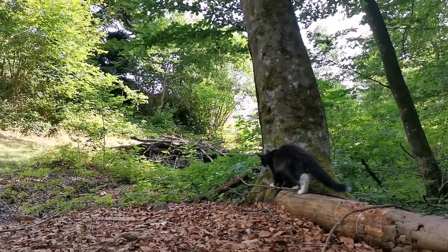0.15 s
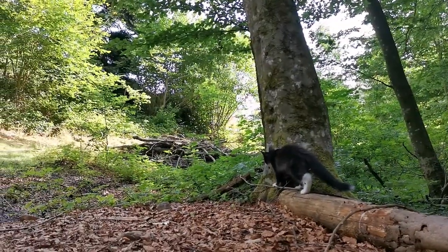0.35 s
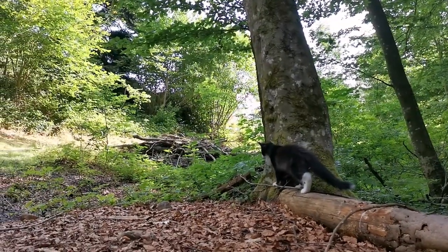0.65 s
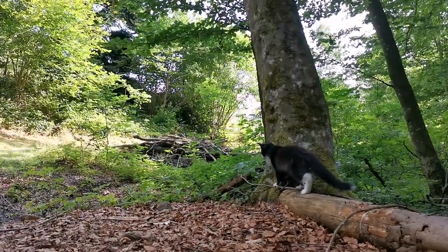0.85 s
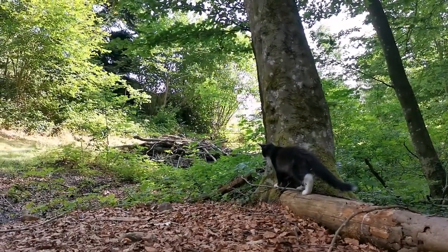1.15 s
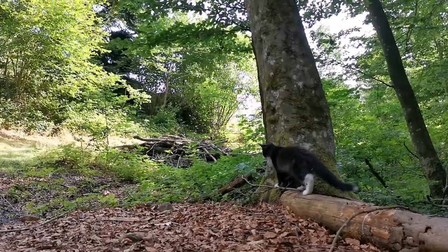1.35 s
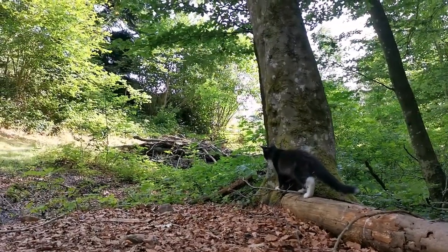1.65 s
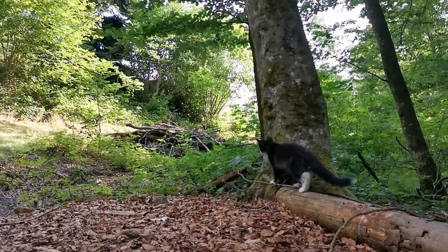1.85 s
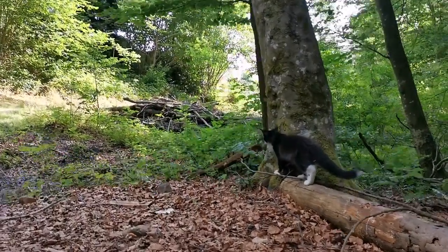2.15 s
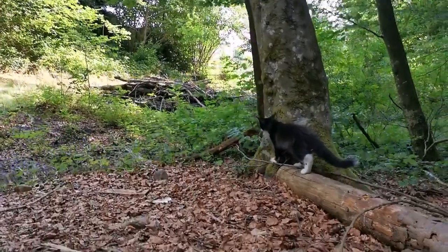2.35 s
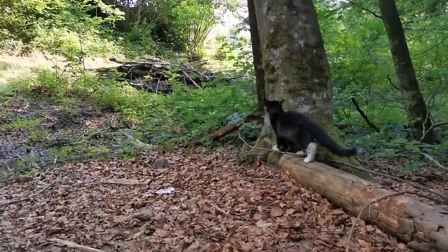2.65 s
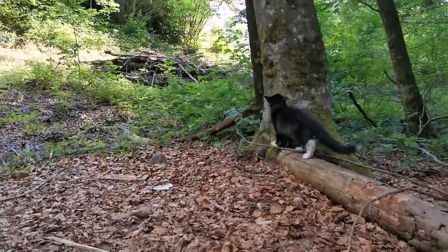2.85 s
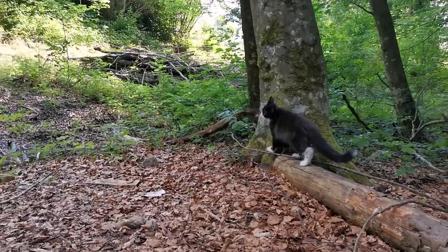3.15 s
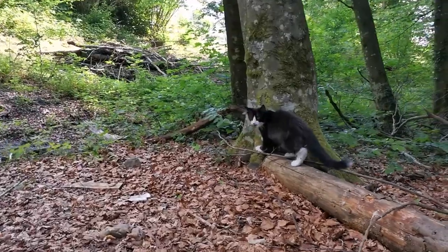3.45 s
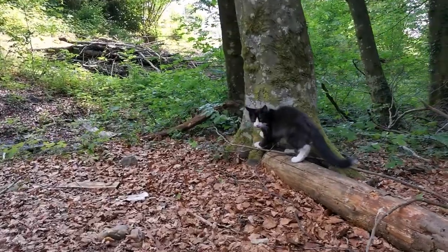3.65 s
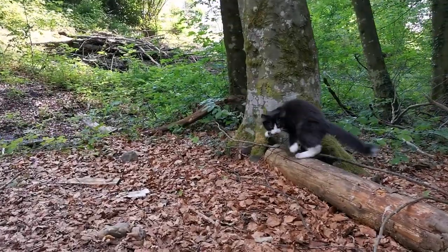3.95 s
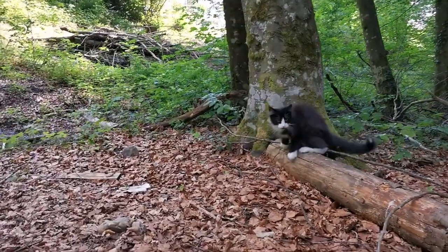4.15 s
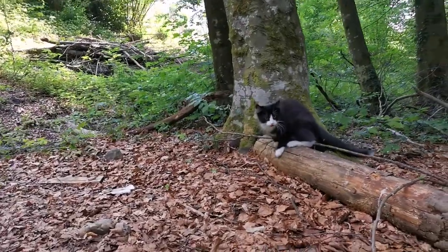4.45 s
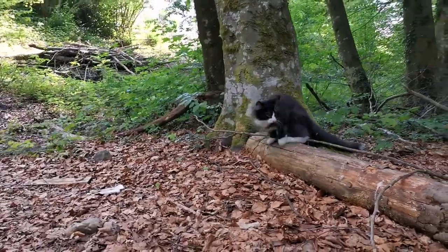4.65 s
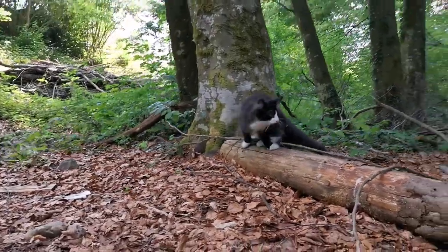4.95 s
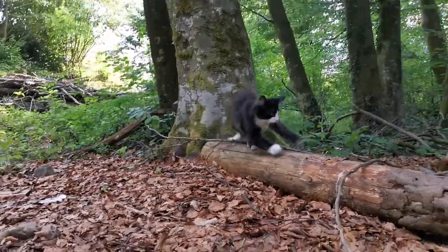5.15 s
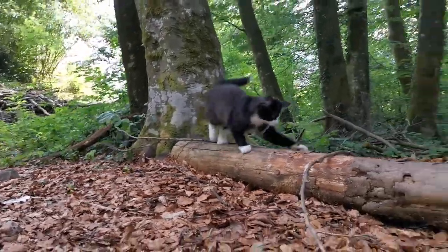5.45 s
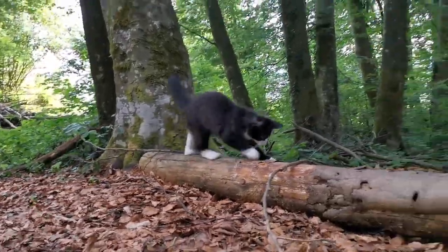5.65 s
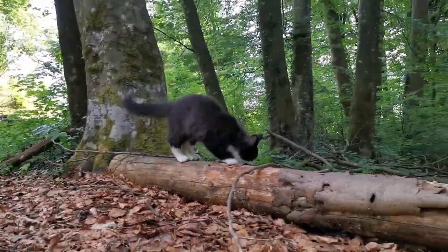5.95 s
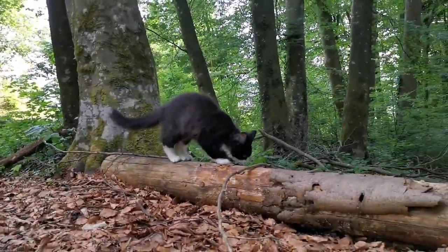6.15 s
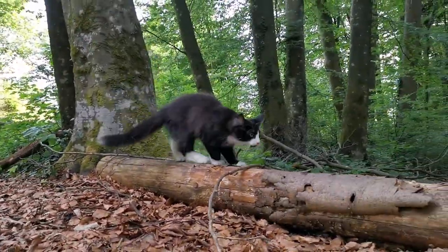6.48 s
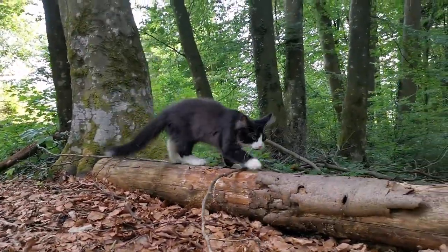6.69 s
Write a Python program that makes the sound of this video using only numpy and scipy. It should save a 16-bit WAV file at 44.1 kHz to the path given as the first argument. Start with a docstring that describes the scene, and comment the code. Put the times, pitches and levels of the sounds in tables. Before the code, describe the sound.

In a wood, near and distant birds sing over softly hissing foliage. A few dull knocks and a low rumble come from handling the microphone. Someone then walks slowly over dry leaf litter, crackling leaves and crunching damp sticks, as a bird trills among the trees. The steps end with a run of close, sharp twig cracks, leaving high bird calls and two faint snaps.

```python
"""A summer wood. Over a faint hush of trees and a low rumble of air and handling, a warbler whistles,
joined by tits and far birds; the notes echo off the trunks. From 0.6 s fingers bump the microphone's
case, which rings and thuds. From about 2 s its holder steps through dry leaves, snapping twigs and
crunching damp sticks, while a finch trills and ends in a buzz. The last step falls at 5.5 s;
thin high calls and two faint snaps close the scene."""
import sys
import numpy as np
from scipy import signal
from scipy.fft import rfft, irfft, next_fast_len
from scipy.io import wavfile
from scipy.ndimage import map_coordinates

SR = 44100
rng = np.random.default_rng(int(sys.argv[2]) if len(sys.argv) > 2 else 0)


def wrap_up_sound(samples):
    """Save the sound to the file named by the first command line argument, as 16-bit audio."""
    columns = np.atleast_2d(samples).T
    # keep every value between -1 and 1, then stretch to whole-number steps
    tamed = np.clip(columns, -1, 1)
    steps = np.round(tamed * 32767).astype(np.int16)
    wavfile.write(sys.argv[1], SR, steps)


N = 300762

# Spectra. Each row: frequency in Hz, relative density in dB.
FOLIAGE_SPECTRUM = [(150, -4), (400, -3.5), (1500, -8), (3800, -10.5), (6800, -15), (8600, -33),
                    (15000, -45)]
RUMBLE_SPECTRUM = [(12, -12), (35, 1), (100, -1.5), (260, -18.5), (2000, -59)]
TWIG_SPECTRUM = [(100, 0), (500, -4), (1600, -2.5), (4300, -0.5), (7300, -0.5), (8600, -20), (15000, -40)]
CRUSH_SPECTRUM = [(150, -16.5), (400, -1.5), (900, 0.5), (1600, 3.5), (2600, -4), (9000, -40)]
CRACKLE_SPECTRUM = [(300, -37.5), (1500, -13.5), (2800, -1.5), (4300, 4), (7400, 1), (8500, -12.5),
                    (12000, -32), (15000, -28.5)]
DAMP_WOOD_SPECTRUM = [(200, -26), (450, 4), (1100, 9), (2000, -17.5), (6000, -30)]
# Shifts of the holding hand. Each row: peak time in seconds, level in dB.
HAND_SHIFTS = [(1.98, -48), (2.42, -52), (2.959, -52), (4.12, -48), (4.31, -47.5)]
# Bird notes. Each row: start and length in seconds, start and end pitch in Hz, relative level in dB.
WARBLER_SLURS = [(.165, 0.052, 3750, 3180, -47), (.359, 0.034, 3310, 3000, -47),
                 (.392, 0.038, 3010, 2720, -49), (.722, 0.076, 3750, 3120, -48.5),
                 (.925, 0.037, 4230, 3730, -47.5), (1.312, 0.039, 3520, 2990, -50.5),
                 (1.39, .075, 3820, 3584, -46), (1.525, 0.049, 2780, 2570, -49),
                 (1.876, 0.041, 3650, 3380, -51), (2.14, 0.058, 4000, 3610, -48)]
TIT_CALLS = [(.57, 0.042, 4900, 5730, -60.5), (1.06, 0.067, 5660, 6520, -43),
             (2.005, 0.064, 7780, 6520, -41.5), (4.36, 0.09, 7410, 6750, -43.5),
             (6.06, 0.11, 6100, 7400, -53.5)]
THIN_NOTES = [(0.72, 0.12, 7300, 7030, -53.5), (0.884, 0.11, 7380, 7120, -54.5),
              (1.095, 0.077, 7510, 7100, -57), (1.299, 0.11, 7100, 6350, -59.5),
              (3.796, 0.15, 7380, 6800, -54), (4.798, 0.3, 5400, 5300, -52),
              (6.44, 0.16, 5360, 5150, -60.5)]
FAR_BIRD_NOTES = [(1.1, .36, 2115, 2008, -66), (2.92, 0.165, 1953, 2010, -54.5)]
FINCH_SCOOPS = [(3.679, 0.07, 2650, 1992, -50), (3.79, .08, 3100, 3370, -38.5)]
FINCH_FLOURISH = [(3.91, 0.022, 4840, 4920, -44.5), (3.935, 0.1, 4410, 3400, -49.5),
                  (4.105, .12, 4690, 5650, -51), (4.372, 0.081, 3804, 4254, -51)]
# Rising whistles: the warbler's, and last a far bird's late note. Each row: start and length in seconds, end
# pitch in Hz, relative level in dB.
RISING_WHISTLES = [(0.0, 0.046, 4050, -48), (0.082, 0.073, 3543, -45), (0.266, 0.044, 2350, -57.5),
                   (0.482, 0.049, 3700, -46.5), (0.85, 0.069, 3300, -53), (1.729, 0.1, 3090, -48),
                   (1.76, 0.12, 2435, -59), (2.066, 0.055, 4070, -50.5), (6.41, 0.096, 3580, -62)]
# Contact calls. Each row: start in seconds, relative level in dB.
CONTACT_CHIPS = [(0.0, -48), (0.065, -40), (0.171, -40.5), (2.626, -39.5), (2.77, -38.5), (2.921, -46),
                 (3.011, -44.5), (3.092, -45)]
# Finger bumps. Each row: start in seconds, level in dB, pitch in Hz, relative thud level in dB.
CASE_KNOCKS = [(0.63, -36, 396, -2), (1.2858, -13, 430, -8.5), (1.640, -32.5, 377, -3),
               (1.739, -36.5, 560, 4.5), (1.866, -32.5, 412, -27), (2.112, -31.5, 530, -16),
               (2.216, -15.5, 561, -5), (5.261, -39, 313, -6)]
# Case resonances. Each row: multiple of the pitch, relative level in dB.
CASE_MODES = [(0.7, -2), (1, 3.5), (1.55, -1), (2.4, -3.5), (3.7, -4.5)]
# Twig breaks. Each row: start in seconds, level in dB, high-pass corner in Hz.
TWIG_SNAPS = [(1.93, -22, 5400), (2.309, -15.5, 4830), (3.354, -11, 4100), (4.167, -21, 5000),
              (4.766, -9.5, 2520), (4.9344, -13.5, 690), (4.988, -22.5, 800), (5.376, -21.5, 2500),
              (5.027, -19, 2720), (5.079, -12.5, 485), (5.1017, -14, 615), (5.107, 1.5, 420),
              (5.129, -21.5, 1590), (5.215, -23.5, 1020), (5.404, -19.5, 2500), (5.447, -10, 2170),
              (5.544, -11.5, 1200), (6.299, -26.5, 1500), (6.414, -25.5, 980)]
# Trill syllables. Each row: delay and length in seconds, start and end pitch in Hz, relative level in dB.
HIGH_STROKES = [(0, 0.027, 6700, 5090, 1.5), (0.035, 0.0316, 5010, 4435, 0.5),
                (0.069, 0.035, 4200, 3800, -4)]
LOW_STROKES = [(.004, .04, 4400, 3605, 0), (.026, .035, 3700, 2648, -3), (.07, .05, 3450, 2950, -3)]
# Foot presses. Each row: time of full weight in seconds, rise in seconds per 20 dB, hold in seconds,
# crush level in dB, crackle level in dB.
FOOTSTEPS = [(2.519, 0.43, 0.034, -61.5, -45.5), (3.121, 0.01, 0.07, -50.5, -44.5),
             (3.27, 0.24, 0.21, -50, -43.5), (3.55, 1, 0.056, -59.5, -40.5), (4.41, 0.6, 0.075, -57, -51),
             (4.772, 0.28, 0.15, -51, -44.5), (5.483, 0.43, 0.076, -54, -43)]
# Damp sticks. Each row: start in seconds, level in dB.
STICK_CRUNCHES = [(3.174, -38), (3.352, -26), (3.439, -29.5), (3.985, -39), (4.137, -43)]
# Microphone ports. Each row: frequency in Hz, left minus right in dB, lag of the right in radians.
PORT_RESPONSE = [(89, -8, 0), (497, -3.5, 0), (1530, 1, 0), (3120, 6, 1.5), (4500, -1, 3), (5220, 3, 4),
                 (6570, 12, 6), (8000, 16, 7), (11000, -1, 7.5)]

NEAR_CORRELATION, FAR_CORRELATION = 0.76, 0.51


def from_db(db):
    """Decibels to gain."""
    return 10 ** (np.asarray(db) / 20)


def unit_rms(x):
    """Scale to unit power."""
    return x / np.sqrt(np.mean(x ** 2) + 1e-20)


def add(out, start_s, sound):
    """Mix a sound in at a time."""
    i = max(0, int(start_s * SR))
    out[..., i:i + sound.shape[-1]] += sound[..., :N - i]


def drift(rate_hz, size):
    """Random wander, spread about 1."""
    at = np.arange(size) * rate_hz / SR
    return map_coordinates(rng.standard_normal(size // 20 + 2), [at], order=1, mode="wrap")


def colour(x, spectrum):
    """Minimum-phase filter of a given spectrum, unit power gain."""
    size = next_fast_len(N + SR // 2, True)
    hz, db = np.transpose(spectrum)
    log_hz = np.log(np.arange(size // 2 + 1) * SR / size + 1)
    gain = unit_rms(from_db(np.interp(log_hz, np.log(hz), db)))
    cepstrum = irfft(np.log(gain), size)[:size // 2]
    cepstrum[1:] *= 2
    return irfft(rfft(x, size) * np.exp(rfft(cepstrum, size)), size)[..., :N]


def stereo(pair, correlation):
    """Two independent signals to correlated left and right."""
    mid = np.sqrt(1 + correlation) * pair[0]
    side = np.sqrt(1 - correlation) * pair[1]
    return np.array([mid + side, mid - side]) / np.sqrt(2)


def noise(size, correlation):
    """Stereo white noise."""
    return stereo(rng.standard_normal((2, size)), correlation)


def foliage(level_db=-63.5):
    """Far leaves hiss evenly."""
    return from_db(level_db) * colour(noise(N, FAR_CORRELATION), FOLIAGE_SPECTRUM)


def rumble(air_db=-59.5, shift_half_width_s=0.052):
    """Air rumbles in lumps, more when the hand shifts."""
    t = np.arange(N) / SR
    hand = sum(from_db(db) / (1 + ((t - peak_s) / shift_half_width_s) ** 2) for peak_s, db in HAND_SHIFTS)
    air = from_db(air_db + 2.6 * drift(rate_hz=14, size=N))
    return colour(noise(N, FAR_CORRELATION) * np.hypot(air, hand), RUMBLE_SPECTRUM)


def forest(x, far_t60_s, near_t60_s, far_db, onset_s=0.0013):
    """Near trunks and leaves scatter quick echoes, far ones a tail."""
    t = np.arange(SR) / SR
    near = noise(SR, FAR_CORRELATION) * from_db(-60 * t / near_t60_s)
    far = noise(SR, FAR_CORRELATION) * from_db(far_db - 60 * t / far_t60_s)
    echoes = unit_rms((near + far) * (1 - np.exp(-t / onset_s))) / np.sqrt(SR)
    return signal.fftconvolve(np.atleast_2d(x), echoes, axes=1)[:, :N]


def bird(notes, bend, waver, direct_db, echo_db, t60_s=1.14, arch=0, buzz=0, buzz_hz=155):
    """Gliding sine notes, direct and via the trees; more bend nears the end pitch sooner."""
    song = np.zeros(N)
    for start_s, length_s, start_hz, end_hz, db in notes:
        progress = np.linspace(0, 1, int(length_s * SR))
        hump = np.abs(np.sin(np.pi * progress))
        glide_hz = (end_hz + (start_hz - end_hz) * (1 - progress) ** bend) * (1 + arch * hump)
        wobble = waver * drift(rate_hz=402.5, size=len(progress))
        rasp = buzz * np.sin(2 * np.pi * buzz_hz * length_s * progress)
        phase_rad = 2 * np.pi * np.cumsum(glide_hz * (1 + wobble + rasp)) / SR
        swell = np.sqrt(hump) * np.tanh(20 * progress * (1 - progress))
        add(song, start_s, from_db(db) * swell * np.sin(phase_rad))
    echo = forest(song, far_t60_s=t60_s, near_t60_s=0.48, far_db=-5.5)
    return from_db(direct_db) * song + from_db(echo_db) * echo


def warbler(start_ratio=0.94):
    """Mellow falling slurs and slightly rising whistles, with one late far-bird note."""
    whistles = [(start_s, length_s, hz * start_ratio, hz, db)
                for start_s, length_s, hz, db in RISING_WHISTLES]
    return bird(WARBLER_SLURS + whistles, bend=2.41, waver=0.004, direct_db=-2.5, echo_db=-1.7, t60_s=1.2)


def contact_calls(length_s=0.0085, start_hz=5010, end_hz=7344):
    """Sharp upward chips."""
    notes = [(start_s, length_s, start_hz, end_hz, db) for start_s, db in CONTACT_CHIPS]
    return bird(notes, bend=2.12, waver=0.0045, direct_db=3.5, echo_db=5.5, t60_s=0.26)


def chorus(from_s, to_s, low_hz, high_hz, level_db, count, length_s=0.09, slide=0.06):
    """Far birds: short notes at random times and pitches, nearly all echo."""
    notes = []
    for k, (when, pitch, turn) in enumerate(rng.random((count, 3))):
        start_s = from_s + (to_s - from_s) * (k + when) / count
        hz = low_hz * (high_hz / low_hz) ** pitch
        notes.append((start_s, length_s, hz, hz * (1 + slide * (2 * turn - 1)), level_db))
    return bird(notes, bend=0.98, waver=0.0219, direct_db=-20, echo_db=3)


def tits():
    """High calls, raspy from fast pitch modulation."""
    return bird(TIT_CALLS, bend=2.366, waver=0.0266, buzz=0.048, direct_db=-6.5, echo_db=6, t60_s=0.66)


def case_knocks(contact_s=0.00099, case_t60_s=0.013, dulling=0.26,
                rock_s=0.004, thud_t60_s=0.079, thud_hz=52.6, thud_hz_per_db=1.9):
    """A fingertip rings and rocks the damped case; heavier means a brighter ring and a deeper thud."""
    out, t = np.zeros(N), np.arange(SR // 5) / SR
    for start_s, db, hz, thud_db in CASE_KNOCKS:
        ring = sum(from_db(mode_db + dulling * db * max(ratio - 1, 0) - 60 * t / case_t60_s)
                   * np.sin(2 * np.pi * hz * ratio * t) for ratio, mode_db in CASE_MODES)
        ring *= 1 - np.exp(-t / contact_s)
        thud = np.sin(2 * np.pi * (thud_hz - thud_hz_per_db * db) * t)
        thud *= from_db(thud_db - 60 * t / thud_t60_s) * (1 - np.exp(-t / rock_s))
        add(out, start_s, from_db(db) * (ring + thud))
    return out


def thin_whistles(upper_ratio=1.16, upper_db=-18):
    """High arched bird notes with a faint second voice."""
    upper = [(start_s, length_s, start_hz * upper_ratio, end_hz * upper_ratio, db + upper_db)
             for start_s, length_s, start_hz, end_hz, db in THIN_NOTES]
    return bird(THIN_NOTES + upper, bend=0.93, arch=0.045, waver=0.007, direct_db=-4.5, echo_db=-5)


def far_bird():
    """Low wavering notes, mostly echo."""
    return bird(FAR_BIRD_NOTES, bend=1.17, waver=0.013, direct_db=-11, echo_db=2.5, t60_s=1.6)


def twig_snaps(decay_s=0.00088, splinter_db=-13, fullband_db=-22):
    """One sharp crack, then brief splintering; thin twigs lack the lows."""
    out, t = np.zeros((2, N)), np.arange(SR // 50) / SR
    for start_s, db, corner_hz in TWIG_SNAPS:
        crack = from_db(splinter_db) * noise(len(t), NEAR_CORRELATION) * np.exp(-t / decay_s)
        crack[:, 0] += 1
        highs = signal.sosfilt(signal.butter(2, corner_hz, "high", fs=SR, output="sos"), crack)
        add(out, start_s, from_db(db) * (highs + from_db(fullband_db) * crack))
    return colour(out, TWIG_SPECTRUM)


def finch(start_s=2.297, beat_s=0.1497, count=9, high_count=4, pitch_spread=0.022,
          full_db=-39.5, soft_db=-11.5, swell_s=0.18):
    """An even, swelling trill, high syllables then low; two scoops; a buzzing flourish."""
    notes = []
    for k, pitch in enumerate(1 + pitch_spread * rng.standard_normal(count)):
        since_s = k * beat_s
        level_db = full_db + soft_db * np.exp(-since_s / swell_s)
        for delay_s, length_s, start_hz, end_hz, db in HIGH_STROKES if k < high_count else LOW_STROKES:
            onset_s = start_s + since_s + delay_s
            notes.append((onset_s, length_s, start_hz * pitch, end_hz * pitch, level_db + db))
    trill = bird(notes + FINCH_SCOOPS, bend=1.6, waver=0.0419, direct_db=-5.5, echo_db=4, t60_s=1.4)
    flourish = bird(FINCH_FLOURISH, bend=2, waver=0.035, buzz=0.072, direct_db=6.5, echo_db=10.5)
    return trill + flourish


def foot_pressure(release_db_per_s=223, settle_db=-18, settle_db_per_s=5):
    """Crush and crackle gains: the foot presses, holds and lifts; the leaves slowly spring back."""
    t = np.arange(N) / SR
    full_s, rise_s, hold_s, crush_db, crackle_db = np.transpose(FOOTSTEPS)[:, :, None]
    before_s, after_s = np.maximum(full_s - t, 0), np.maximum(t - full_s - hold_s, 0)
    release = from_db(-release_db_per_s * after_s)
    settle = from_db(settle_db - settle_db_per_s * after_s)
    weight = from_db(-20 * before_s / rise_s) * (release + settle)
    return np.max(weight * from_db(crush_db), axis=0), np.max(weight * from_db(crackle_db), axis=0)


def fractures(per_s, spread_db, clump_db):
    """Tiny breaks of uneven size, in clumps."""
    breaks = rng.random((2, N)) < per_s / SR
    sizes = from_db(spread_db * np.minimum(rng.exponential(1, (2, N)), 4)) * rng.choice([-1, 1], (2, N))
    clumps = from_db(clump_db * drift(rate_hz=70, size=N))
    return stereo(unit_rms(breaks * sizes * clumps), NEAR_CORRELATION)


def leaf_steps(stalk_db=-11.5):
    """A shoe crushes damp litter; dry top leaves crackle and small stalks tick."""
    crush_gain, crackle_gain = foot_pressure()
    crush = fractures(per_s=2200, spread_db=4, clump_db=2.5) * crush_gain
    crackle = fractures(per_s=2600, spread_db=2.5, clump_db=3.5) * crackle_gain
    stalks = fractures(per_s=82, spread_db=2, clump_db=2) * crackle_gain * from_db(stalk_db)
    return (colour(crush, CRUSH_SPECTRUM) + colour(crackle, CRACKLE_SPECTRUM)
            + colour(stalks, TWIG_SPECTRUM))


def stick_crunches(decay_s=0.0018):
    """Damp sticks give way with a short woody knock."""
    out, t = np.zeros(N), np.arange(SR // 20) / SR
    for start_s, db in STICK_CRUNCHES:
        add(out, start_s, from_db(db) * rng.standard_normal(len(t)) * np.exp(-t / decay_s))
    return colour(out, DAMP_WOOD_SPECTRUM)


def microphone_ports(x):
    """Two ports differ in level and phase with frequency, at constant total power."""
    size = next_fast_len(N + SR // 10, True)
    hz, balance_db, lag_rad = np.transpose(PORT_RESPONSE)
    log_hz = np.log(np.arange(size // 2 + 1) * SR / size + 1)
    left = from_db(np.interp(log_hz, np.log(hz), balance_db))
    right = np.exp(-1j * np.interp(log_hz, np.log(hz), lag_rad))
    response = np.array([left, right]) * np.sqrt(2 / (1 + left ** 2))
    return irfft(rfft(x, size) * response, size)[:, :N]


def scene():
    """Background, birds, knocks and near ground sounds with a faint echo."""
    birds = warbler() + contact_calls() + tits() + thin_whistles() + far_bird() + finch()
    birds += chorus(from_s=0.05, to_s=6.7, low_hz=2548, high_hz=3943, level_db=-67.5, count=240)
    birds += chorus(from_s=5.8, to_s=6.8, low_hz=5390, high_hz=7640, level_db=-63, count=40)
    ground = twig_snaps() + leaf_steps() + stick_crunches()
    ground_echo = from_db(-18) * forest(ground, far_t60_s=0.95, near_t60_s=0.53, far_db=-40)
    return foliage() + rumble() + birds + case_knocks() + ground + ground_echo


def record(dry):
    """Two unlike ports, then a steep low-pass."""
    cutoff_hz = 15700
    lowpass = signal.ellip(10, 0.1, 70, cutoff_hz, fs=SR, output="sos")
    return signal.sosfilt(lowpass, microphone_ports(dry))


dry = scene()
out = record(dry)
wrap_up_sound(out)
```